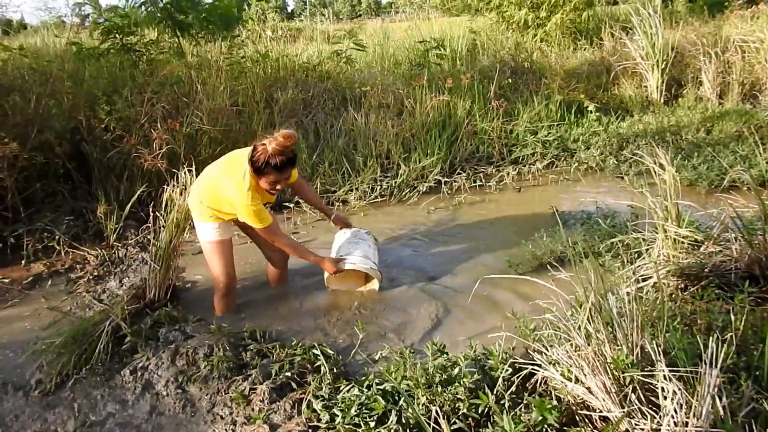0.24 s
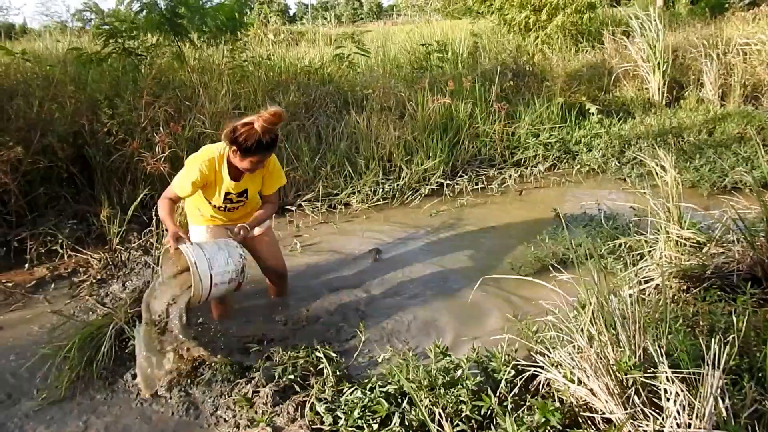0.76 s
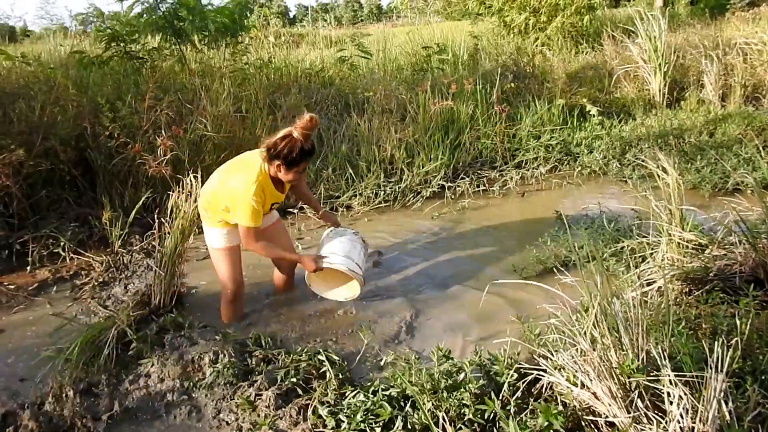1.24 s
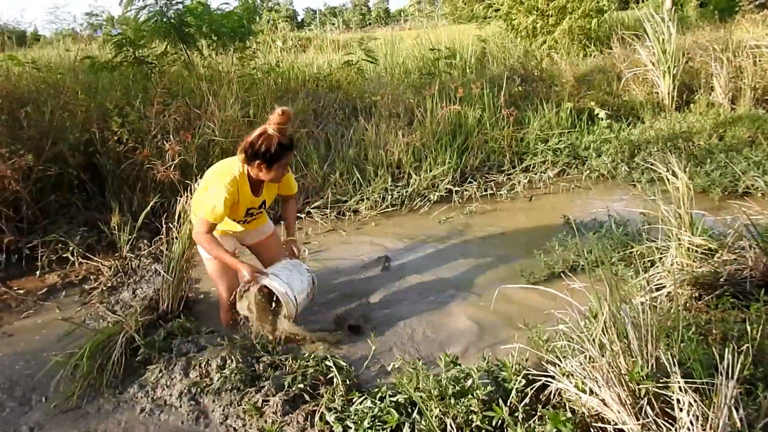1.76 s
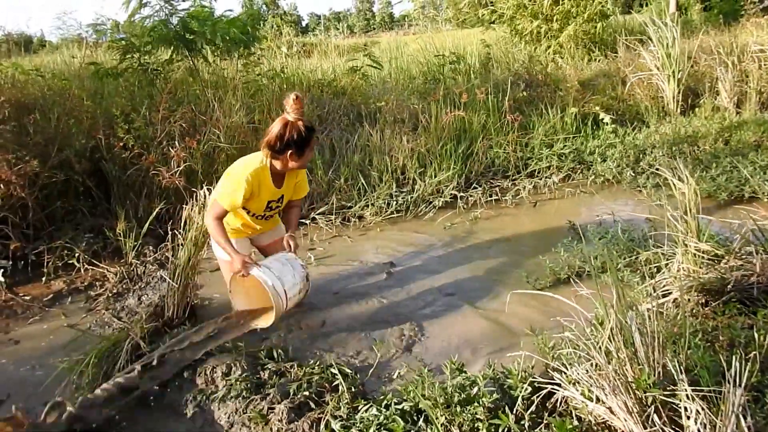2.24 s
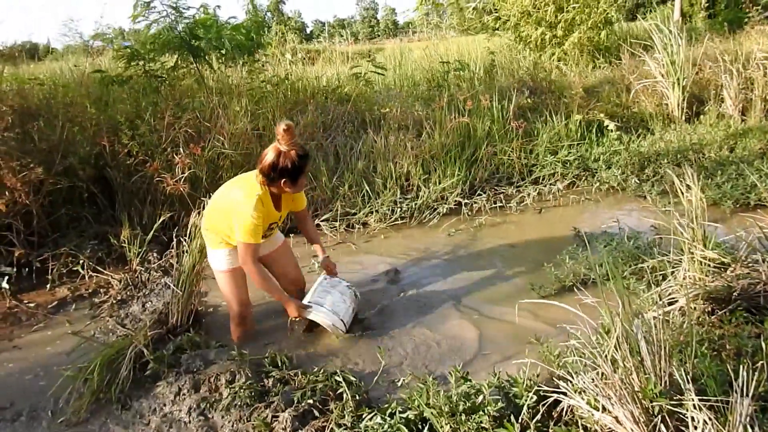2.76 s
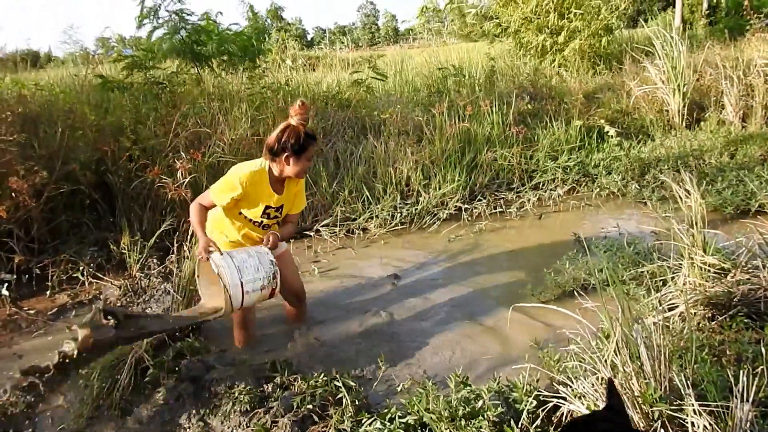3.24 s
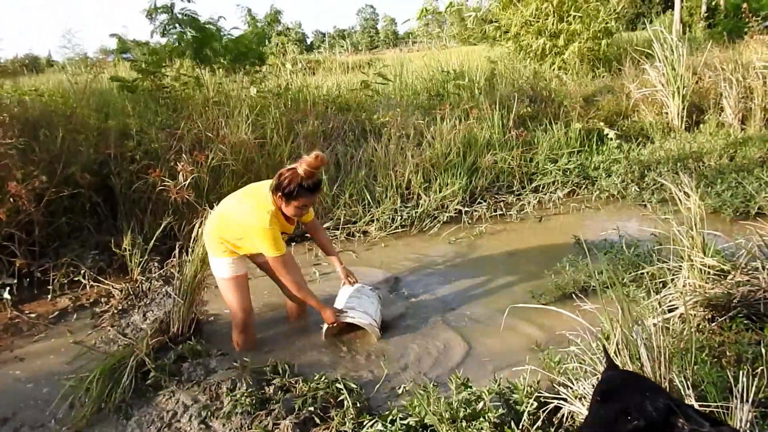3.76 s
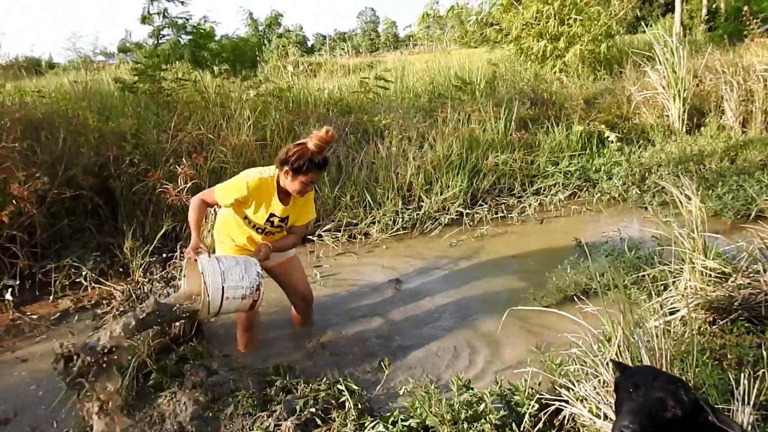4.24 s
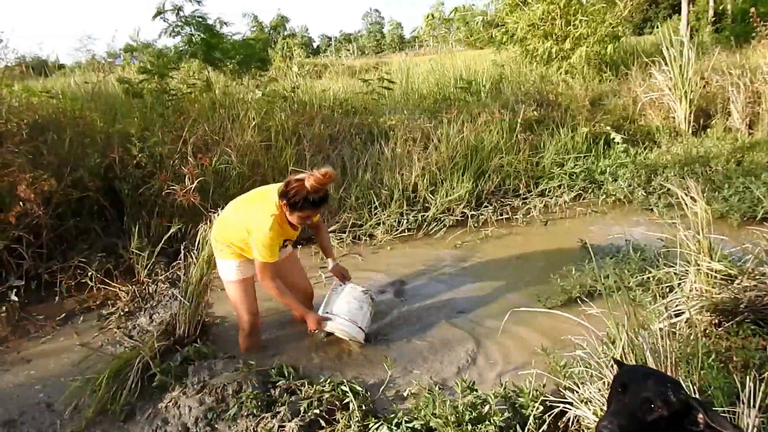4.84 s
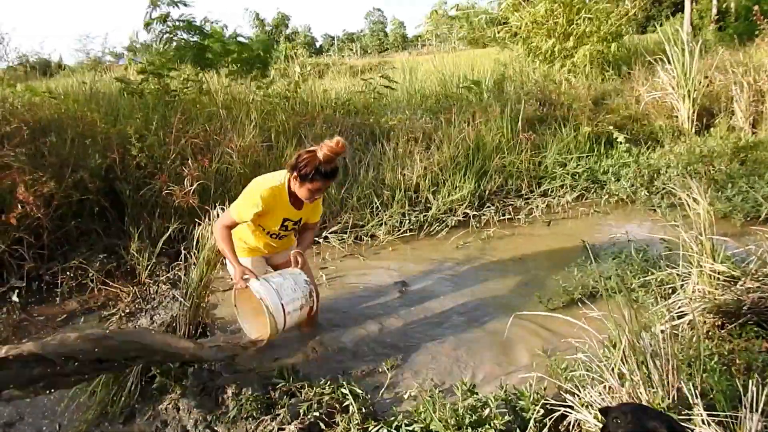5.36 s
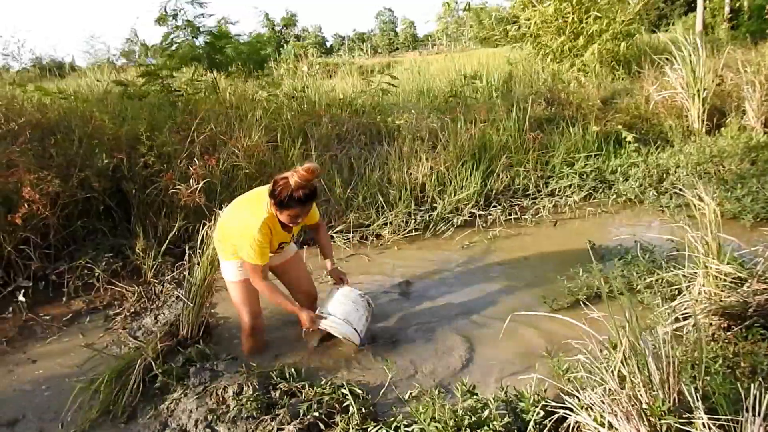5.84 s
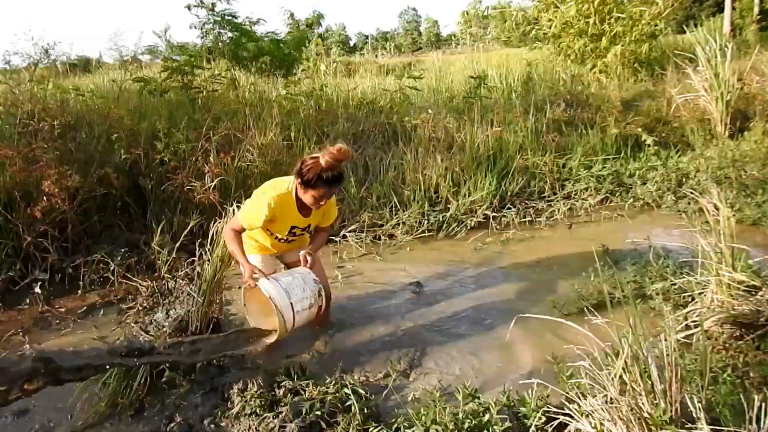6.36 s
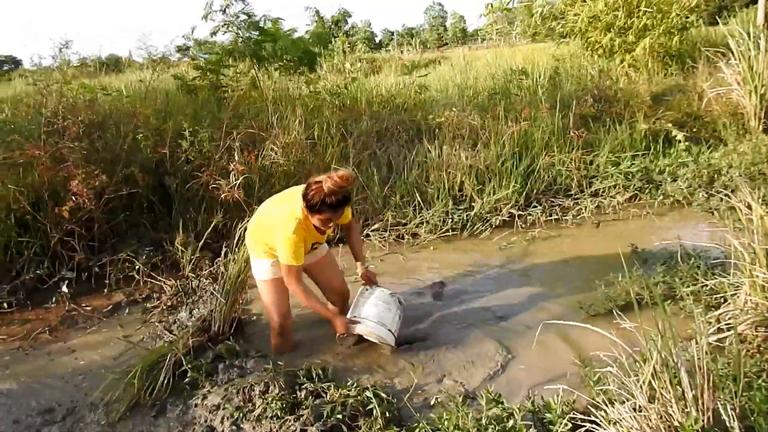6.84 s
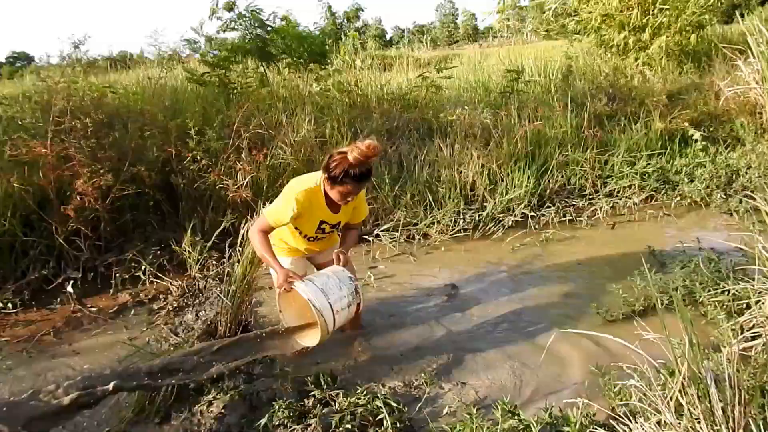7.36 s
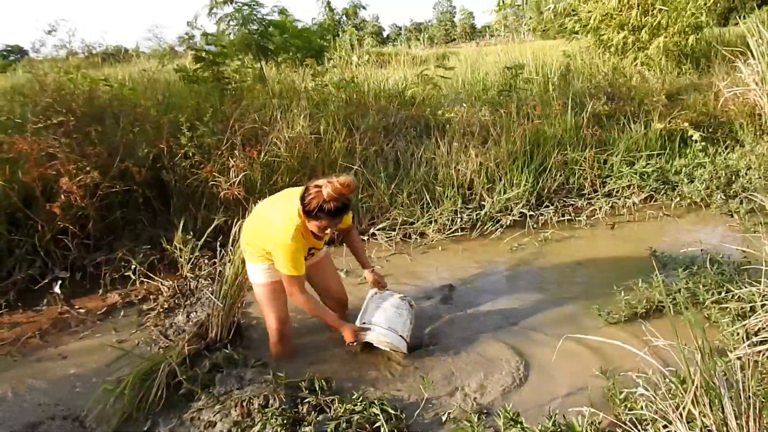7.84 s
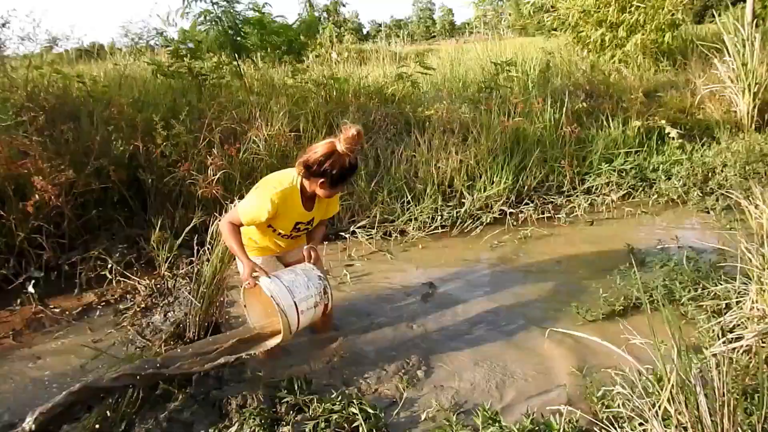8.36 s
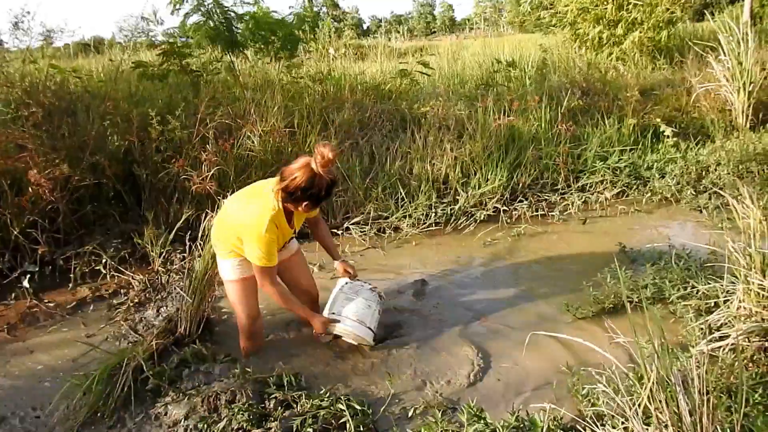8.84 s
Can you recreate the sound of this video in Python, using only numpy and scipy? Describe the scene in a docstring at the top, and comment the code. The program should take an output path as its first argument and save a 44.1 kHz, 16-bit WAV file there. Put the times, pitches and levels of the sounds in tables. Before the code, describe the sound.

Outdoors at a muddy ditch, a plastic bucket scoops and throws water about once a second. Each sheet lands close by, slightly left, with a dull wet slap and bright spray, then patters and runs off. Between throws the bucket sloshes, gulps and drips. Wind rumbles on the small stereo microphone, strongest near the end.

```python
"""A muddy ditch, where someone bails with a plastic bucket, about one throw a second.
Each sheet of water slaps onto wet mud: banded random drops and mist make the spray, gliding sines the bubbles.
Damped sines with a noise crack make the slaps; the bucket gulps, sloshes and drips between throws.
Gusts, made of shaped noise, buffet the two ports of a small microphone, whose limiter holds down the peaks."""
import sys
import numpy as np
from scipy import signal
from scipy.fft import rfft, irfft, next_fast_len
from scipy.io import wavfile
from scipy.ndimage import uniform_filter1d

SR = 44100
rng = np.random.default_rng(int(sys.argv[2]) if len(sys.argv) > 2 else 0)


def to_wav(s):
    """Save 16-bit WAV."""
    ch = np.atleast_2d(s).T  # columns
    pcm = np.round(np.clip(ch, -1, 1) * 32767)  # PCM
    wavfile.write(sys.argv[1], SR, pcm.astype(np.int16))


N = 401738
TIME = np.arange(N) / SR

# All event levels are relative: each source trims them further.
# bucketfuls thrown: (landing time [s], landing length [s], build-up [s per 20 dB; zero or less starts at once],
# churning bulk level [dB], fine spray level [dB], run-off level [dB])
THROWS = [(0.0, 0.03, -5.5, -17.5, -17.5, -34), (1.225, .022, 0.38, -20, -20, -36.5),
          (2.335, 0.02, 0.36, -18.5, -19.5, -35.5), (3.45, 0.06, 0.18, -19.5, -21, -34),
          (4.53, 0.04, 0.13, -18.5, -19.5, -33.5), (5.54, 0.075, 0, -21, -16.5, -33.5),
          (6.533, .05, 0.07, -19, -19.5, -34.5), (7.542, .04, 0.03, -20.5, -20, -36.5),
          (8.482, 0.054, 0.0251, -20.5, -21, -40.5)]
# the bucket dips, drags and spills: (time [s], length [s], churning bulk level [dB], fine spray level [dB])
SLOSHES = [(.489, 0.012, -34.5, -28.5), (0.698, 0.06, -37, -29.5), (1.02, 0.056, -33.5, -27.5),
           (1.415, 0.1, -31, -29), (1.878, .12, -34, -31), (2.195, .04, -29, -26),
           (2.806, .025, -32.5, -31.5), (3.866, 0.021, -30, -33), (4.057, 0.032, -36, -29),
           (4.345, 0.02, -30.5, -28), (5.089, 0.061, -34, -38.5), (5.826, .025, -33, -44),
           (6.108, 0.048, -35.5, -35), (7.112, 0.026, -31, -29), (7.79, 0.07, -32.5, -35.5),
           (8.016, 0.025, -31.5, -35), (8.239, .03, -32, -33.5), (8.767, .1, -31.5, -30),
           (8.961, 0.012, -35, -33.5)]
# masses of water slapping the mud or the bucket: (time [s], level [dB], pitch of the trapped air [Hz])
SLAPS = [(0.001, -8.5, 703), (0.031, -5, 610), (0.037, -6, 540), (0.843, -16, 680), (1.174, -12, 514),
         (1.219, -4, 306), (1.223, -5, 540), (1.243, -13, 560), (2.285, -11, 618), (2.301, -11, 644),
         (2.331, -10, 634), (2.343, -8, 535), (2.412, -17, 680), (3.388, -12.5, 660), (3.467, -1.5, 680),
         (3.472, 2.5, 380), (4.539, -6.5, 589), (4.567, -12, 617), (5.529, -14, 247), (5.538, -4, 735),
         (5.565, -5, 900), (6.533, -7.5, 605), (6.537, -12, 300), (6.836, -10, 562), (7.544, 0, 520),
         (7.575, -12, 650), (8.485, -9, 590), (8.53, -17, 701)]
# gobs of water bursting on the pool, the bucket or the bank: (time [s], level [dB], centre [Hz])
SPATTERS = [(0.027, -16, 3500), (0.499, -15.5, 3470), (1.019, -11, 4770), (1.072, -16, 1290),
            (1.634, -7, 4800), (2.819, -26, 2010), (2.999, -19.5, 5790), (3.508, -7.5, 4500),
            (3.869, -14, 2808), (5.443, -17, 5210), (5.538, -7, 3400), (6.255, -25, 1550),
            (6.33, -21, 2302), (6.948, -18, 1690), (7.196, -25, 4600), (7.367, -15, 2680),
            (7.541, -7, 6526), (8.011, -14.5, 3208)]
# single gulps and plops round the bucket: (time [s], level [dB], starting pitch [Hz])
PLOPS = [(2.534, -20, 635), (2.944, -21, 543), (3.06, -19.5, 730), (3.076, -19, 742), (3.115, -17.5, 1260),
         (3.82, -20, 1141), (3.868, -14.5, 1180), (4.347, -14.5, 1528), (5.908, -14, 1150),
         (5.962, -19, 1500), (6.291, -20, 1380), (6.391, -18, 2050), (6.838, -11, 685), (6.912, -13, 3395),
         (7.126, -16.5, 1090), (7.174, -24, 587), (7.212, -24, 1250), (7.84, -19, 699),
         (7.866, -16.5, 1050), (8.754, -16, 1265), (8.824, -19, 640), (8.854, -16.5, 957)]
# colour of splashing water: (frequency [Hz], level [dB])
SPLASH_COLOUR = [(200, 0.5), (400, -11), (620, -2), (900, -3.5), (1450, -1), (2100, -4.5), (2800, -6.5),
                 (4400, -4), (5500, -1.5), (6700, 2.5), (7900, -8.5), (10000, -21.5), (12500, -34),
                 (15500, -44)]
# gusts that strike the microphone: (time [s], length [s], buffeting level [dB])
GUSTS = [(0.0, 0.13, -23.5), (0.23, 0.05, -23), (0.417, 0.11, -23.5), (0.656, 0.3, -25),
         (1.118, 0.084, -16.5), (1.355, 0.082, -22), (1.632, 0.057, -17), (1.748, 0.32, -13.5),
         (2.375, 0.058, -14), (2.612, 0.078, -14.5), (3.18, 0.03, -18), (3.724, 0.053, -19.5),
         (4.075, 0.051, -12.5), (4.208, 0.043, -18), (4.531, 0.12, -12.5), (4.757, 0.058, -13.5),
         (5.066, 0.044, -14.5), (5.727, 0.034, -21.5), (7.259, 0.39, -10.5), (7.761, 0.11, -17.5),
         (8.015, 0.094, -11), (8.165, 0.058, -6), (8.501, 0.099, -7), (8.594, 0.041, -3.5),
         (8.714, 0.061, -16), (9.026, 0.048, -15)]
# breeze between gusts, before it wavers: (time [s], buffeting level [dB])
BREEZE = [(0.0, -40), (.6, -38), (1.55, -34), (2.25, -22), (2.82, -32.5), (3.2, -29.5), (3.95, -34),
          (4.4, -25.5), (5.25, -33), (5.85, -32), (6.3, -37), (6.9, -35.5), (7.3, -26), (7.9, -27.5),
          (9.1, -32)]
# where the wind comes from: (time [s], left minus right port level [dB])
WIND_SIDE = [(0.0, 3.5), (1.8, 0), (4.6, -2), (7.3, 3.5), (9.1, 3.5)]
# single hard eddies inside the gusts: (time [s], level [dB])
BUFFETS = [(1.825, -15), (1.925, -9), (1.943, -9), (2.666, -9.5), (7.425, -19), (7.636, -7.5), (8.03, -15),
           (8.162, -7.5), (8.65, -8)]
# colour of the slow eddies at the ports: (frequency [Hz], level [dB])
EDDY_COLOUR = [(20, -26), (35, -13), (55, -2.5), (90, 3.5), (170, -4), (230, -17.5), (330, -25), (600, -81)]
# colour of the small eddies torn off by a hard gust: (frequency [Hz], level [dB])
FLUTTER_COLOUR = [(80, -12), (130, 3.5), (195, 0.5), (260, -12), (480, -20.5), (900, -38), (1600, -37.5)]

# a landing dies away [s per 20 dB]; its spray flies up a moment after the bulk [s]
BULK_FALL_S, SPRAY_FALL_S, SPRAY_LAG_S = 0.148, 0.085, 0.0073
# first drops patter down ahead of the sheet: spray level as it lands [dB], build-up [s per 20 dB]
PATTER_DB, PATTER_RISE_S = -26, 0.39
# water runs off the bank: steady time [s], fall [s per 20 dB], spray against bulk [dB]
RUNOFF_S, RUNOFF_FALL_S, RUNOFF_SPRAY_DB = 0.3, 0.29, 2
SLOSH_RISE_S, SLOSH_FALL_S = 0.06, 0.12  # [s per 20 dB]
# a heavy sheet tears and lands in lumps: spread [dB], rate [1/s], time constant [s]
LUMP_DB, LUMPS_PER_S, LUMP_FALL_S = 1.02, 120, 0.002
# the stirred ditch never stops lapping
LAPPING_BULK_DB, LAPPING_SPRAY_DB = -38.0, -36.5
GUST_RISE_S, GUST_FALL_S = 0.031, 0.06  # [s per 20 dB]


def from_db(db):
    """Decibels to gain."""
    return 10 ** (np.asarray(db) / 20)


def rms_one(x):
    """Scale to an rms of 1."""
    return x / np.sqrt(np.mean(x ** 2) + 1e-20)


def in_time(rows):
    """Read a (time, value) curve at every sample."""
    return np.interp(TIME, *np.transpose(rows))


def at_hz(points, hz):
    """Read a spectrum on a log-frequency axis."""
    frequencies, levels = np.transpose(points)
    return np.interp(np.log(hz), np.log(frequencies), levels)


def band(x, low, high):
    """Causal band-pass."""
    sos = signal.butter(2, [low, min(high, 0.45 * SR)], "band", fs=SR, output="sos")
    return signal.sosfilt(sos, x + 1e-18)


def colour(x, spectrum):
    """A causal (minimum-phase) filter with the given spectrum."""
    size = next_fast_len(N + SR // 4)
    hz = np.maximum(np.fft.rfftfreq(size, 1 / SR), 1)
    cepstrum = irfft(np.log(from_db(at_hz(spectrum, hz))), size)
    # folding the cepstrum forward makes the phase minimal
    cepstrum[1:size // 2] *= 2
    cepstrum[size // 2 + 1:] = 0
    return irfft(rfft(x, size) * np.exp(rfft(cepstrum)), size)[:, :N]


def drift(rate):
    """Slow chance with a spread of 1; a higher rate wanders faster."""
    step = 40  # samples between slow values
    r = np.exp(-2 * np.pi * rate * step / SR)
    slow = signal.lfilter([1], [1, -2 * r, r * r], rng.standard_normal(N // step + 2002))[2000:]
    return np.interp(np.arange(N) / step, np.arange(len(slow)), rms_one(slow))


def lumps(per_s, fall_s):
    """Random surges that swell quickly and die away; mean 0, spread 1."""
    r = np.exp(-1 / (fall_s * SR))
    hits = 1.0 * (rng.random(N) < per_s / SR)
    surges = signal.lfilter([1], [1, -2 * r, r * r], hits)
    return rms_one(surges - surges.mean())


def swell(start, length, level_db, rise_s, fall_s):
    """Power of an attack, hold and release; rise and fall are the times for 20 dB, at least 1 ms."""
    before = np.maximum(start - TIME, 0) / max(rise_s, 1e-3)
    after = np.maximum(TIME - start - length, 0) / max(fall_s, 1e-3)
    return from_db(level_db) ** 2 * np.exp(-np.log(100) * np.minimum(before + after, 10))


def add(out, s, sound):
    """Mix a sound in at a given time."""
    start = int(np.clip(s * SR, 0, N - 1))
    out[start:start + len(sound)] += sound[:N - start]


def bubble(hz, cycles, rise):
    """A pocket of air rings, its pitch climbing as it nears the surface; height about 1."""
    turns = np.arange(int(cycles * SR / hz)) * hz / SR
    age = turns / cycles
    ring = np.sin(2 * np.pi * turns * (1 + rise * age))
    return ring * np.exp(-np.log(1000) * age) * (1 - np.exp(-2 * turns))


def burst(hz, width, fall_s, grit_db=4.5, attack_s=0.0019):
    """A quick cluster of cracks within a factor `width` of a pitch, dying by 20 dB in fall_s; height 1."""
    age = np.arange(SR // 10) / SR
    noise, grit = rng.standard_normal((2, len(age)))
    width = max(width, 1.1)
    envelope = np.minimum(age / attack_s, 1) * from_db(-20 * age / fall_s)
    cracks = band(noise * from_db(grit_db * grit) * envelope, hz / width, hz * width)
    return cracks / np.abs(cracks).max()


def drops(per_s, size_db, lead=1.3, spread=0.8):
    """Random impacts, each from its own direction: the right port hears it `lead` +- `spread` samples later."""
    at = np.flatnonzero(rng.random(N) < per_s / SR)
    sizes = from_db(size_db * np.minimum(rng.exponential(1, len(at)), 4))
    sizes = sizes * rng.choice([-1, 1], len(at))
    # denser drops are smaller, so density alone does not change the loudness
    sizes = rms_one(sizes) * np.sqrt(SR / per_s[at])
    late = np.clip(np.round(at + rng.normal(lead, spread, len(at))), 0, N - 1).astype(int)
    return np.array([np.bincount(at, sizes, N), np.bincount(late, sizes, N)])


def nearness(bulk_db, far_db=-35, near_db=-21):
    """0 for the light sloshing at the bucket, 1 for the heavy sheet that lands close by."""
    return np.clip((bulk_db - far_db) / (near_db - far_db), 0, 1)


def water_level(bulk_db, spray_db, hz, low_hz=1250, high_hz=4800, bulk_trim_db=1.29, spray_trim_db=1.5):
    """Low pitches come from the churning bulk, high ones from the spray."""
    fine = np.clip(np.log(hz / low_hz) / np.log(high_hz / low_hz), 0, 1)
    return (1 - fine) * (bulk_db + bulk_trim_db) + fine * (spray_db + spray_trim_db)


def water_motion():
    """Bulk and spray levels [dB]: each throw patters, lands and runs off; the bucket sloshes in between."""
    bulk, spray = from_db(LAPPING_BULK_DB) ** 2, from_db(LAPPING_SPRAY_DB) ** 2
    for s, length, rise_s, bulk_db, spray_db, runoff_db in THROWS:
        patter = swell(s, 0, PATTER_DB, PATTER_RISE_S, SPRAY_FALL_S)
        runoff = swell(s, RUNOFF_S, runoff_db, rise_s, RUNOFF_FALL_S)
        landing_bulk = swell(s, length, bulk_db, rise_s, BULK_FALL_S)
        landing_spray = swell(s + SPRAY_LAG_S, length, spray_db, rise_s, SPRAY_FALL_S)
        bulk = bulk + landing_bulk + runoff
        spray = spray + patter + landing_spray + runoff * from_db(RUNOFF_SPRAY_DB) ** 2
    for s, length, bulk_db, spray_db in SLOSHES:
        slosh = swell(s, length, 0, SLOSH_RISE_S, SLOSH_FALL_S)
        bulk = bulk + slosh * from_db(bulk_db) ** 2
        spray = spray + slosh * from_db(spray_db) ** 2
    bulk_db, spray_db = 10 * np.log10(bulk), 10 * np.log10(spray)
    lumps_db = LUMP_DB * nearness(bulk_db) * lumps(LUMPS_PER_S, LUMP_FALL_S)
    return bulk_db + lumps_db, spray_db + lumps_db / 2


def splashing(bulk_db, spray_db, level_db=8.5, grains_per_cycle=0.2, size_db=0.58, patchy_db=2.5,
              clump_db=1.23, mist_db=-4.5, mist_slope_db=1.5, weight_db=6.0, cavity_hz=1100,
              smacks_per_s=300, smack_db=-8.5):
    """Countless drops burst in pitch bands, more with more water; the grass scatters a smooth mist."""
    edges = np.geomspace(200, 16000, 21)
    crowd = from_db(0.6 * (bulk_db + 30))
    clumps = clump_db * drift(54)
    heavy_db = weight_db * nearness(bulk_db)
    # fat drops smack on the mud and sound in all bands at once
    smacks = from_db(smack_db) * drops(smacks_per_s * crowd, size_db)
    white = rng.standard_normal((2, 2, N))
    out = np.zeros((2, N))
    for k, (low, high) in enumerate(zip(edges, edges[1:])):
        hz = np.sqrt(low * high)
        grains = drops(grains_per_cycle * hz * crowd, size_db)
        mist = from_db(mist_db + mist_slope_db * np.log2(hz / 5000))
        # only a heavy mass of water opens the large, low-pitched cavities
        cavity_db = heavy_db * np.clip(np.log2(cavity_hz / hz), 0, 1)
        water_db = water_level(bulk_db, spray_db, hz)
        gain = from_db(level_db + cavity_db + water_db + clumps + patchy_db * drift(24.3))
        # smacks flip sign from band to band
        texture = grains + smacks * (-1) ** k + mist * white[k % 2]
        out += band(gain * texture / np.hypot(1, mist), low, high)
    return colour(out, SPLASH_COLOUR)


def slaps(level_db=4.5, cycles=6, scatter_s=0.0053, pitch_spread=0.32, crack_db=-9, crack_hz=1500,
          crack_width=1.73, crack_fall_s=0.0041, count=5):
    """A mass of water hits with a crack and traps a quick cluster of heavily damped air pockets."""
    out = np.zeros(N)
    for s, peak_db, hz in SLAPS:
        height = from_db(peak_db + level_db)
        add(out, s, height * bubble(hz, cycles, 0))
        add(out, s, height * from_db(crack_db) * burst(crack_hz, crack_width, crack_fall_s))
        for wait, pitch in rng.standard_normal((count, 2)):
            pocket = bubble(hz * np.exp(pitch_spread * abs(pitch)), cycles, 0.026)
            add(out, s + scatter_s * abs(wait), height * pocket)
    return out


def spatters(level_db=7.0, width=1.74, fall_s=0.021):
    """Flung gobs of muddy water burst with a crisp, wide-band tick; the right port hears them a sample later."""
    out = np.zeros(N)
    for s, peak_db, hz in SPATTERS:
        add(out, s, from_db(peak_db + level_db) * burst(hz, width, fall_s))
    return colour(np.array([out, np.roll(out, 1)]), SPLASH_COLOUR)


def bubbles(bulk_db, spray_db, count=1500, level_db=3.5, size_db=2.5, cycles=32, rise=0.14):
    """Air folded into the water rings as bubbles of every size, most thickly where the water churns."""
    out = np.zeros(N)
    churned = np.cumsum(from_db(bulk_db / 2))
    for when, pitch, size, life in rng.random((count, 4)):
        at = np.searchsorted(churned, when * churned[-1])
        hz = 540 * (6800 / 540) ** pitch
        loud_db = water_level(bulk_db[at], spray_db[at], hz) + level_db - size_db * np.log(size + 0.22)
        add(out, at / SR, from_db(loud_db) * bubble(hz, cycles * (0.5 + life), rise))
    return out


def plops(level_db=-0.5, splinter_db=-11, cycles=36, rise=0.053, scatter_s=0.011, count=2):
    """One large bubble closes, and a few smaller, mostly higher ones split off it."""
    out = np.zeros(N)
    for s, peak_db, hz in PLOPS:
        add(out, s, from_db(peak_db + level_db) * bubble(hz, cycles, rise))
        for wait, pitch in rng.standard_normal((count, 2)):
            splinter = bubble(hz * np.exp(0.2 + 0.3 * pitch), cycles, rise)
            add(out, s + scatter_s * abs(wait), from_db(peak_db + level_db + splinter_db) * splinter)
    return out


def drips(bulk_db, count=130, level_db=10.5, size_db=1.0, cycles=25, rise=0.17):
    """Blobs run off the bucket and the bank at random; each plips in and a smaller drop follows."""
    out = np.zeros(N)
    for when, pitch, size, wait in rng.random((count, 4)):
        at = int(when * N)
        hz = 800 * (2700 / 800) ** pitch
        # above -33 dB of bulk the drips grow no louder
        height = from_db(min(bulk_db[at], -33) + level_db - size_db * np.log(size + 0.1))
        add(out, at / SR, height * bubble(hz, cycles, rise))
        add(out, at / SR + 0.015 * wait, height / 2 * bubble(hz * (1 + wait / 2), 2 * cycles, rise))
    return out


def buffets(level_db=0.0, hz=310, width=1.44, fall_s=0.041):
    """A single hard eddy knocks on the microphone, differently at each port."""
    out = np.zeros((2, N))
    for s, peak_db in BUFFETS:
        for port in out:
            add(port, s, from_db(peak_db + level_db) * burst(hz, width, fall_s))
    return out


def wind_strength(waver_db=4.0):
    """Level in dB of the buffeting: sudden gusts on top of a wavering breeze."""
    breeze = from_db(in_time(BREEZE) + waver_db * drift(22)) ** 2
    gusts = sum(swell(s, length, db, GUST_RISE_S, GUST_FALL_S) for s, length, db in GUSTS)
    return 10 * np.log10(breeze + gusts)


def turbulence(spectrum, even_s=0.0385):
    """Pressure noise, unrelated at the two ports, with its slow swells evened out."""
    size = next_fast_len(N)
    hz = np.maximum(np.fft.rfftfreq(size, 1 / SR), 1)
    # roll off beyond both ends of the table
    ends = 1 / (1 + (hz / spectrum[-1][0]) ** 4) / (1 + (spectrum[0][0] / hz) ** 2)
    shape = from_db(at_hz(spectrum, hz)) * ends
    noise = irfft(rfft(rng.standard_normal((2, size))) * shape, size)[:, :N]
    power = uniform_filter1d(noise ** 2, max(int(even_s * SR), 2), axis=1)
    return noise / np.sqrt(power + 1e-12)


def wind(eddy_db=5.0, eddy_limit_db=-13.5, flutter_db=-3.5, flutter_growth=0.92, lumpy_db=4.0):
    """Gusts rumble at the ports; as they harden the rumble levels off and ragged flutter takes over."""
    gust_db = wind_strength()
    side_db = in_time(WIND_SIDE)
    rumble_gain = from_db(gust_db + eddy_db) / np.hypot(1, from_db(gust_db - eddy_limit_db))
    rumble = rumble_gain * turbulence(EDDY_COLOUR)
    # flutter grows faster than the gust until the gust reaches -15.5 dB
    growth_db = flutter_growth * (np.minimum(gust_db, -15.5) + 15.5)
    flutter_gain = from_db(gust_db + flutter_db + growth_db + lumpy_db * drift(25.7))
    flutter = flutter_gain * turbulence(FLUTTER_COLOUR)
    return (rumble + flutter) * from_db(np.array([side_db, -side_db]) / 2)


def scene(pan_db=1.25, shadow_db=-9.5):
    """Thrown water lands to the left; the housing lifts the upper middle on that side and shades the other."""
    bulk_db, spray_db = water_motion()
    near = nearness(bulk_db)
    left_right = np.array([[1], [-1]])
    water = splashing(bulk_db, spray_db) + slaps() + spatters()
    water = water + bubbles(bulk_db, spray_db) + plops() + drips(bulk_db)
    upper_middle = band(water, 2140, 3700)
    water = water + from_db(shadow_db) * (1 + near) / 2 * upper_middle * left_right
    return water * from_db(pan_db * near * left_right) + buffets() + wind()


def gain_control(x, threshold_db=-18.0, share=0.38, bass_hz=260, window_s=0.0216):
    """Heavy bass turns the whole sound down by a share of its excess."""
    bass_power = np.mean(band(x, 30, bass_hz) ** 2, axis=0)
    power = uniform_filter1d(bass_power, max(int(window_s * SR), 2))
    excess_db = np.maximum(10 * np.log10(np.abs(power) + 1e-12) - threshold_db, 0)
    return x * from_db(-share * excess_db)


def record(dry, ceiling_db=-2.0, release_db_per_s=200, cutoff_hz=15800):
    """Heavy bass pulls the gain down, a fast limiter ducks everything after a peak; the top is cut."""
    levelled = gain_control(dry)
    peak_db = 20 * np.log10(np.abs(levelled).max(axis=0) + 1e-9)
    over_db = np.maximum(peak_db - ceiling_db, 0)
    # after each overshoot the gain recovers steadily, along a straight line in dB at release_db_per_s
    release_db = release_db_per_s * TIME
    duck_db = np.maximum.accumulate(over_db + release_db) - release_db
    limited = levelled * from_db(-uniform_filter1d(duck_db, size=16))
    top_cut = signal.ellip(10, 0.1, 80, cutoff_hz, fs=SR, output="sos")
    return signal.sosfilt(top_cut, limited)


dry = scene()
out = record(dry)
to_wav(out)
```